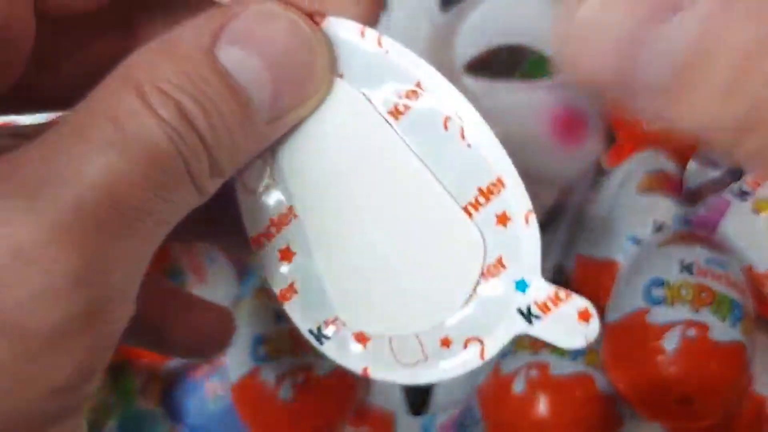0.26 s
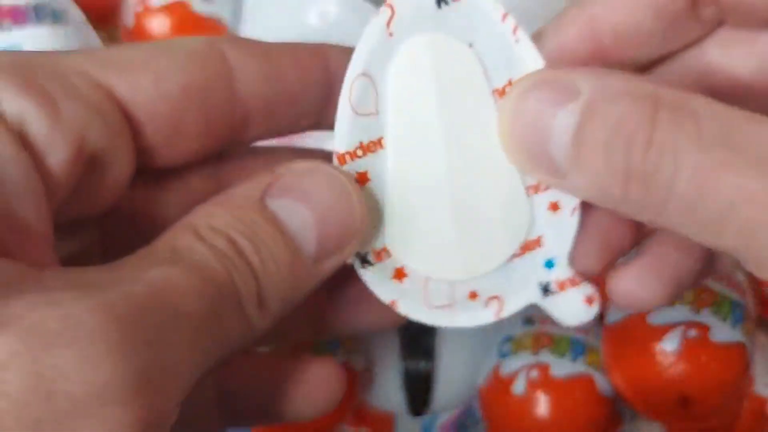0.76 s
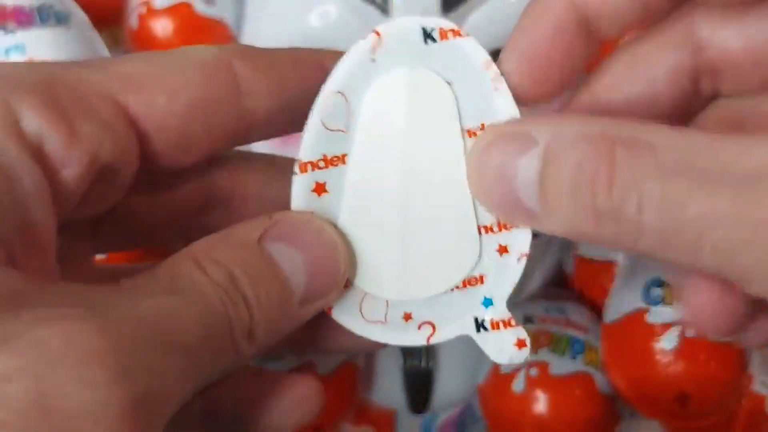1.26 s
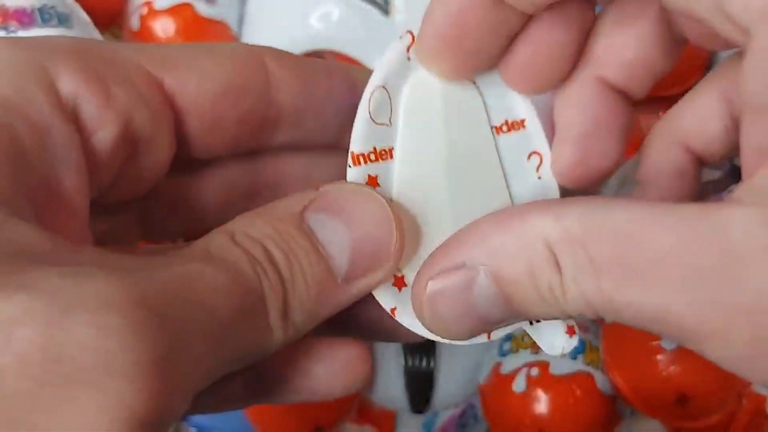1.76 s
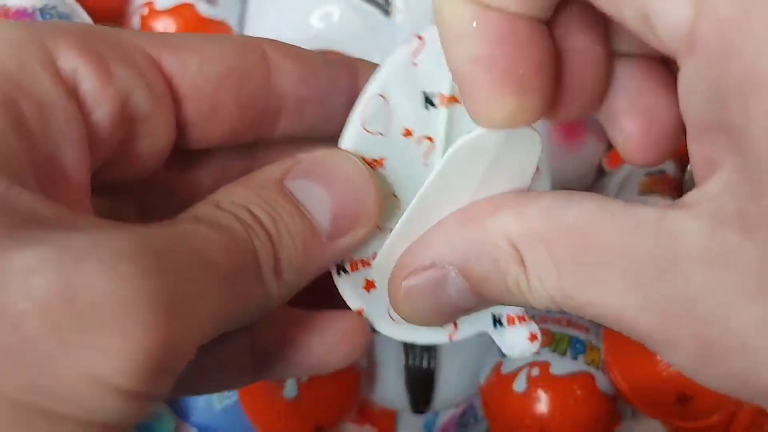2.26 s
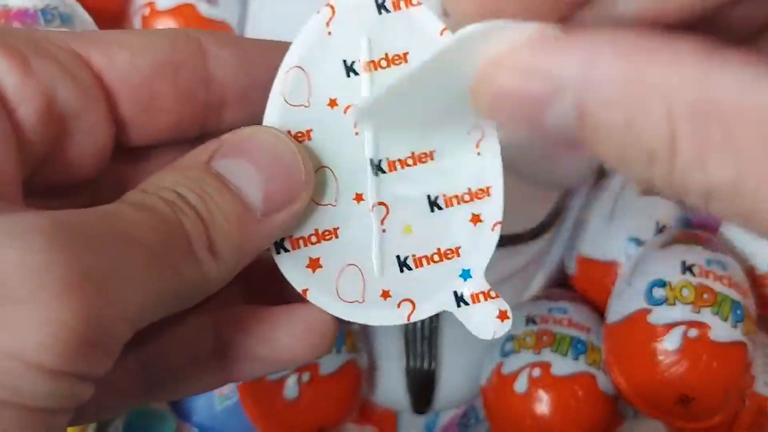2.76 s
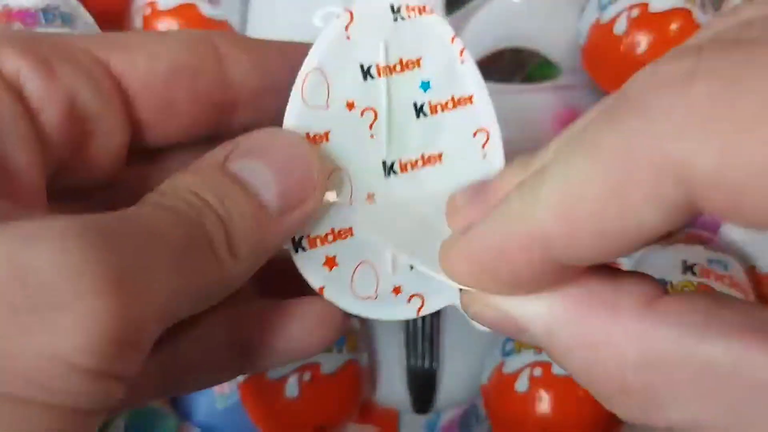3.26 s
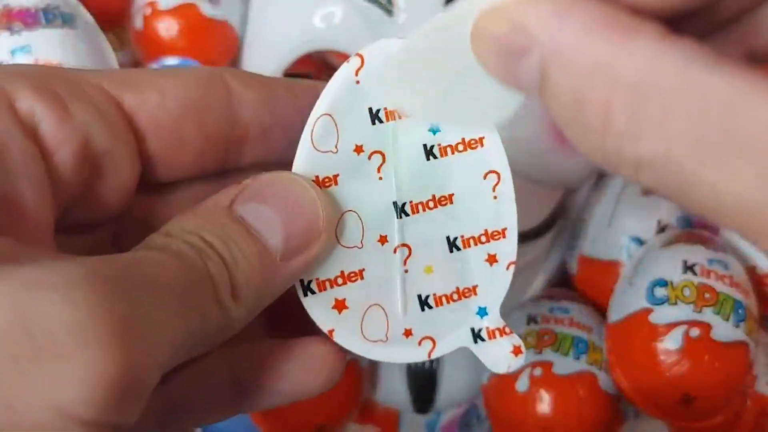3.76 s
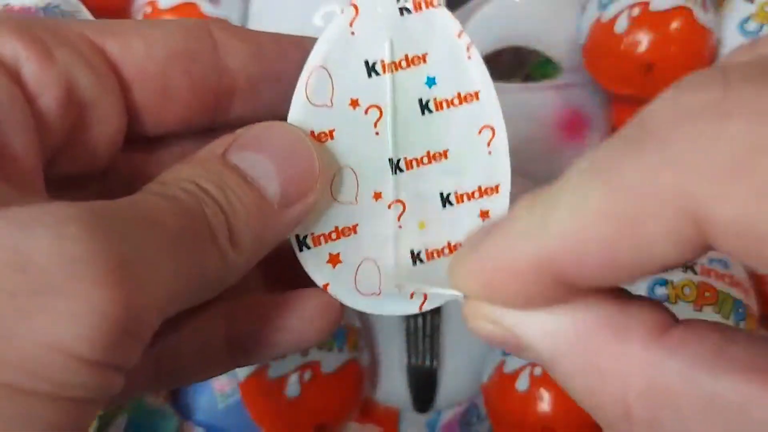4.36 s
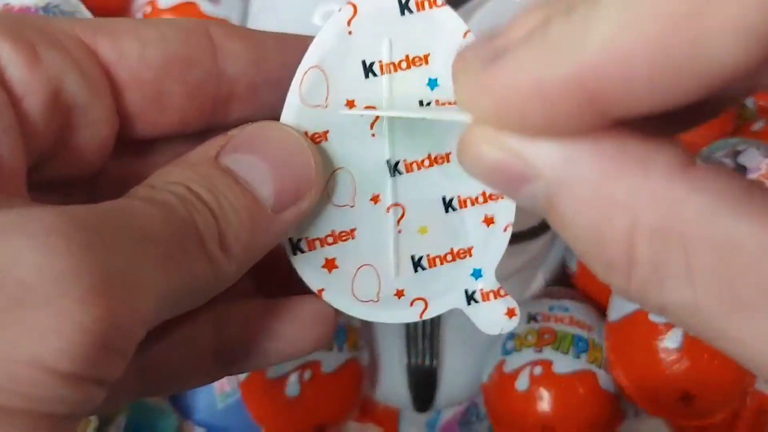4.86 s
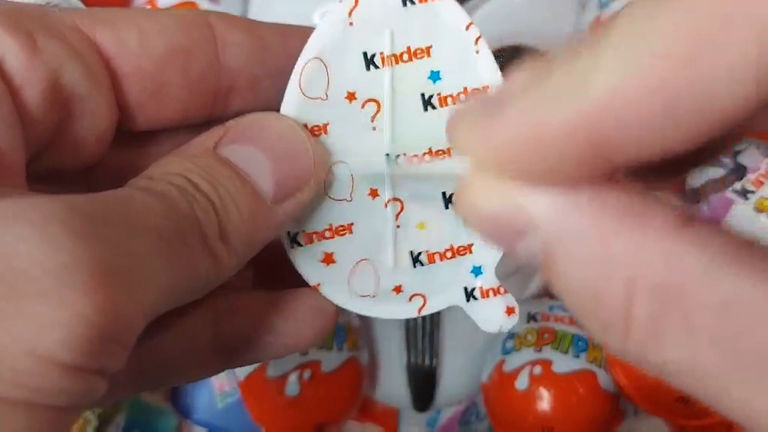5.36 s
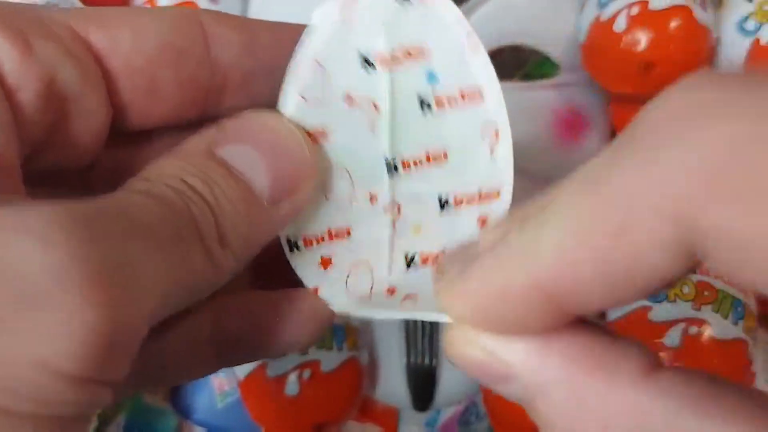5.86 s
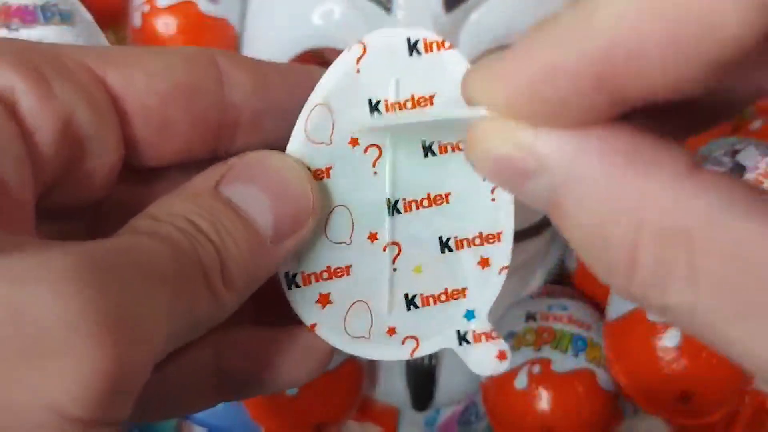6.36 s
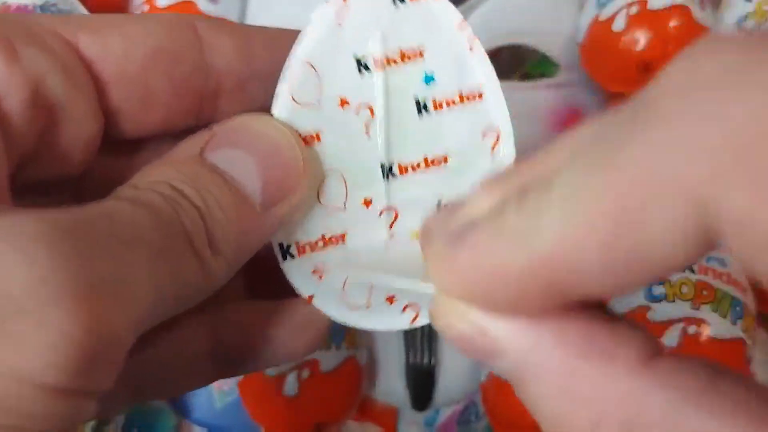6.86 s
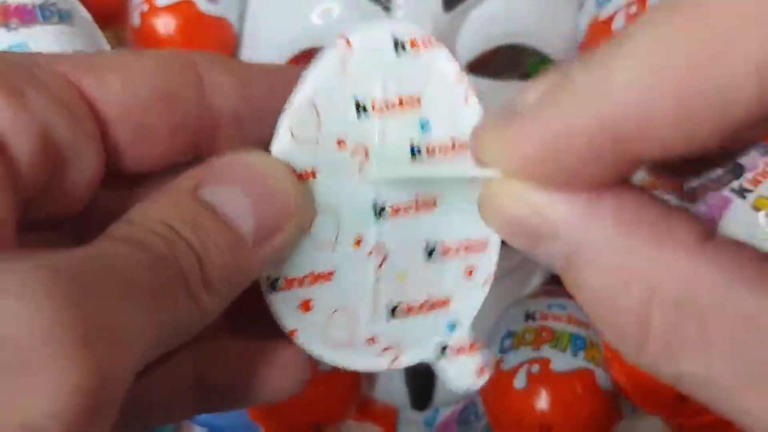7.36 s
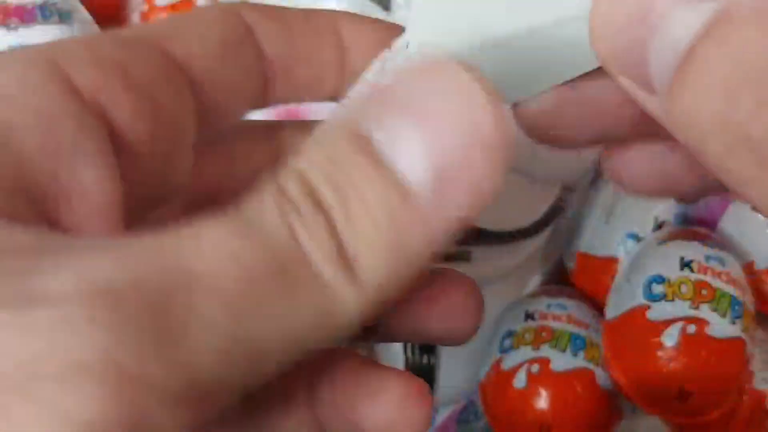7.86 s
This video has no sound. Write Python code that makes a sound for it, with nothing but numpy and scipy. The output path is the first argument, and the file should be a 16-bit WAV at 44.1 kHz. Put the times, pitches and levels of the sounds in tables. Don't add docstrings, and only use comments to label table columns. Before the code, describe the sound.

Close, crisp foil ticks, a loud ripping crackle as glue lets go, slow crinkly scraping, then quick repeated scratchy flicks on a hollow plastic shell.

```python
import sys
import numpy as np
from scipy import signal
from scipy.fft import rfft, irfft, next_fast_len
from scipy.io import wavfile
from scipy.ndimage import uniform_filter1d

SR = 44100
rng = np.random.default_rng(int(sys.argv[2]) if len(sys.argv) > 2 else 0)


def pcm_store(signal):
    levels = np.round(np.clip(np.atleast_2d(signal), -1, 1) * 32767)
    wavfile.write(sys.argv[1], SR, levels.astype(np.int16).T)


def decibels_to_gain(level_db):
    exponent = np.asarray(level_db, float) / 20
    return 10 ** exponent


N = 358091

# freq_hz, level_db (per Hz)
FOIL_COLOUR = [(900, -19), (1500, -2), (2160, -4), (2630, -1.5), (3800, -2), (4300, -1.5), (5100, -4.5),
               (6300, -3.5), (7100, -6), (7600, -21.5), (8000, -22), (8400, -53)]
# freq_hz, level_db (per Hz)
SHELL_COLOUR = [(35, -72.5), (60, -16), (294, -2), (1060, 0), (1270, 2), (1740, -8), (2150, -11),
                (2400, -12), (3120, -51.5), (5280, -120)]


def evened(x):
    return x / np.sqrt(np.mean(x ** 2) + 1e-20)


def read(points, hz):
    freq_hz, value = np.transpose(points)
    return np.interp(np.log(hz + 1), np.log(freq_hz + 1), value)


def add(mix, start_s, sound):
    part = mix[round(start_s * SR):][:len(sound)]
    part += sound[:len(part)]


def causal(*spectra):
    hz = abs(np.fft.fftfreq(4096, 1 / SR))
    level_db = np.maximum(sum(read(s, hz) for s in spectra), -90)
    log_gain = np.log(decibels_to_gain(level_db))
    taps = np.fft.ifft(np.exp(np.conj(signal.hilbert(log_gain)))).real[:1024]
    return taps / np.linalg.norm(taps)


def ring(x, hz, width_hz):
    r = np.exp(-np.pi * width_hz / SR)
    poles = [1, -2 * r * np.cos(2 * np.pi * hz / SR), r * r]
    once = signal.lfilter([1, -1], poles, x)
    return signal.lfilter([1], poles, once)


def patchy(x, depth_db):
    z = signal.stft(x, nperseg=256)[2]
    patches = uniform_filter1d(rng.standard_normal(z.shape), 5, 0)
    patches = uniform_filter1d(patches, 9, 1)
    return signal.istft(z * decibels_to_gain(depth_db * evened(patches)), nperseg=256)[1][:N]


def gritty(grain_db, slips_per_s, wander_db):
    size = decibels_to_gain(grain_db * np.minimum(rng.exponential(1, N), 3))
    happens = rng.random(N) < slips_per_s / SR
    slips = size * happens * rng.standard_normal(N)
    clumps = evened(uniform_filter1d(rng.standard_normal(N), 180))
    hiss = evened(slips) + 0.86 * rng.standard_normal(N)
    return patchy(evened(hiss * decibels_to_gain(grain_db * clumps)), wander_db)


def slide(bright, hollow, grain_db, wander_db, *colour):
    hiss = gritty(grain_db, 2800, wander_db) * bright
    rumble = gritty(grain_db, 1800, wander_db) * hollow
    hiss = signal.oaconvolve(hiss, causal(*colour))[:N]
    return hiss + signal.oaconvolve(rumble, causal(SHELL_COLOUR))[:N]


def air():
    # freq_hz, level_db
    tone_colour = [(35, -24.5), (60, -9), (140, -5), (450, -27.5), (710, -16.5), (1300, -22), (2300, -28.5),
                   (6500, -31.5), (8000, -56)]
    # freq_hz, rms_db
    hum_lines = [(60, -92.5)]
    tone_rms_db = -76.5
    t = np.arange(N) / SR
    gain = decibels_to_gain(read(tone_colour, np.fft.rfftfreq(N, 1 / SR)))
    tone = irfft(rfft(rng.standard_normal(N)) * gain, N)
    waver = 1 + 0.3 * evened(uniform_filter1d(rng.standard_normal(N), 2500))
    hum = sum(decibels_to_gain(db) * np.sqrt(2) * np.sin(2 * np.pi * hz * t) for hz, db in hum_lines)
    return decibels_to_gain(tone_rms_db) * evened(tone) + waver * hum


def rub():
    # start_s, rise_s, hold_s, hiss_db, rumble_db (hollow, relative)
    grips = [(0.059, 0.07, 0.054, -72, -5), (0.41, 0.002, 0.014, -53, -1),
             (0.561, 0.17, 0.22, -54.5, -10.5), (0.813, 0.044, 0.011, -49.5, -4),
             (0.948, 0.07, 0.026, -68.5, -6), (1.021, 0.081, 0.032, -62, -10.5),
             (1.1, 0.038, 0.041, -55.5, -23), (1.201, 0.0064, 0.0096, -53.5, -4.5),
             (1.254, 0.069, 0.015, -55, -32), (1.3, 0.0047, 0.038, -56, -13),
             (1.344, 0.044, 0.0037, -52.5, -3), (1.592, 0.0035, 0.0049, -49.5, -2.5),
             (1.659, 0.0098, 0.0051, -65.5, -9), (1.779, 0.025, 0.006, -57.5, 1.5),
             (1.511, 0.0053, 0.032, -50, -4.5), (1.733, 0.24, 0.02, -51, -1.5),
             (1.974, 0.038, 0.14, -67.5, 1.5), (2.694, 0.013, 0.0085, -66, -6.5),
             (2.866, 0.031, 0.0058, -63, 3), (7.594, 0.0069, 0.033, -48, -0.5),
             (7.706, 0.01, 0.0036, -49, 9), (7.773, 0.0056, 0.08, -53, -4), (7.958, 0.099, 0.076, -46, -6),
             (8.112, 0.063, .02, -52, -20)]
    # start_s, rise_s, hold_s, hiss_db, rumble_db
    drags = [(2.15, 0.018, 0.13, -58, -5), (2.268, 0.072, 0.005, -30.5, 1.5),
             (2.319, 0.025, 0.13, -49.5, -3), (2.502, 0.1, 0.12, -48.5, -5),
             (2.948, 0.0052, 0.0091, -48.5, 5), (3.079, 0.098, 0.35, -46.5, -7),
             (3.305, 0.038, 0.06, -48, -8), (3.474, 0.2, 0.023, -62.5, -15),
             (3.589, 0.025, 0.071, -58, -1.5), (3.694, 0.12, 0.22, -46.5, -10.5),
             (3.933, 0.042, 0.056, -44.5, -1.5), (4.074, 0.024, 0.054, -55.5, 5.5),
             (4.141, 0.036, 0.015, -36.5, -3.5), (4.21, 0.023, 0.14, -51.5, -22.5),
             (4.366, 0.28, 0.092, -48, -6.5), (3.146, 0.018, 0.0049, -43.5, 1), (3.71, .008, .008, -48, 0),
             (3.81, 0.0054, 0.0027, -50, -4), (4.483, 0.011, 0.002, -38.5, -3),
             (4.526, 0.0094, .003, -49.5, -21), (7.455, 0.015, 0.0043, -39.5, 3)]
    # freq_hz, level_db
    skin_colour = [(1400, -7), (2300, -17), (3150, -16), (3500, -6.5), (4500, -6.5), (7000, -8.5)]
    # freq_hz, level_db
    drag_colour = [(1500, -1.5), (3000, -1), (5000, 0), (6500, 2), (7200, -2)]
    rise_db, sag_db_per_s, lift_db_per_s = 36.5, 26, 603.5
    skin_until_s = 1.29

    t = np.arange(0, N, 64) / SR
    start_s, rise_s, hold_s, hiss_db, rumble_db = np.transpose(grips + drags)[:, :, None]
    since = t - start_s
    eased_db = sag_db_per_s * since + lift_db_per_s * np.maximum(since - hold_s, 0)
    lost_db = np.where(since < 0, -rise_db * since / rise_s, eased_db)
    press = decibels_to_gain(hiss_db - lost_db)
    now = np.arange(N) / SR
    bright = np.interp(now, t, press.sum(0))
    hollow = np.interp(now, t, (press * decibels_to_gain(rumble_db)).sum(0))
    skin = now < skin_until_s
    fingers = slide(bright * skin, hollow * skin, 0.16, 3.6, FOIL_COLOUR, skin_colour)
    spoon = slide(bright * ~skin, hollow * ~skin, 2.3, 2.2, FOIL_COLOUR, drag_colour)
    return fingers + spoon


def flicks():
    # start_s, landing_db, scrape_db, scrape_s
    quick_flicks = [(4.7425, -25.5, -37.5, 0.094), (4.924, -31, -40.5, 0.065), (5.093, -44, -37.5, 0.047),
                    (5.255, -30.5, -31.5, 0.07), (5.4305, -24, -34, 0.08), (5.582, -21, -32.5, 0.11),
                    (5.75, -37, -29.5, 0.098), (5.914, -36.5, -33, 0.079), (6.069, -27.5, -31, 0.069),
                    (6.2352, -29, -30.5, 0.083), (6.376, -30.5, -37, 0.069), (6.516, -36.5, -46.5, 0.083),
                    (6.6367, -49, -37.5, 0.075), (6.789, -44, -30, 0.047), (6.911, -42, -30.5, 0.091),
                    (7.2246, -27, -28, 0.094), (7.396, -30.5, -29, 0.044)]
    # start_s, landing_db, scrape_db, scrape_s
    grazes = [
        (0.488, -56, -45.5, 0.054),
        (7.128, -75.5, -62, 0.024),
    ]
    # freq_hz, level_db
    edge_colour = [(2200, -0.5), (6800, -2.5)]
    pressure, t = np.zeros(N), np.arange(8000) / SR
    for start_s, land_db, scrape_db, scrape_s in quick_flicks + grazes:
        crunch = decibels_to_gain(land_db - 7.0) * (0.04 + t / 0.0038) * np.exp(1 - t / 0.0048)
        lift = 1 / (1 + np.exp((t - scrape_s) / 0.0059))
        scrape = decibels_to_gain(scrape_db - 8.5 - 102 * t) * np.tanh(t / 0.0013) * lift
        add(pressure, start_s, crunch + scrape)
    return slide(pressure, decibels_to_gain(-1.5) * pressure, 2.6, 3.0, FOIL_COLOUR, edge_colour)


def snaps():
    # start_s, crack_peak_db, ring_peak_db, ring_hz (hollow ring of the shell)
    ticks = [(0.518, -10, -29, 2030), (0.8147, -27.5, -36, 1380), (0.8185, -32.5, -59, 1700),
             (1.2, -51, -48.5, 380), (1.305, -36, -54.5, 1380), (1.366, -30, -54, 1970),
             (1.5102, -37, -42, 1130), (1.555, -14.5, -37, 1400), (1.597, -29, -58, 616),
             (1.7066, -34, -37, 1210), (1.73, -38, -42, 1350), (1.7375, -35, -24, 1133),
             (1.7416, -46, -37, 1244), (1.7553, -36.5, -34, 968), (1.9059, -18.5, -34, 1950),
             (1.982, -57.5, -48.5, 740), (2.0235, -26, -26, 2040), (2.041, -27, -47, 2080),
             (2.047, -44, -38, 950), (2.795, -50, -61, 1704), (2.876, -40.5, -51, 1213),
             (7.63, -25.5, -43, 1400), (7.7027, -50, -32, 1180), (7.7333, -29.5, -51, 1370),
             (7.984, -27, -62, 1360), (8.0032, -21, -50, 1330), (8.0403, -28, -68, 1400)]
    tear = [(2.1257, -5, -45, 1660), (2.1309, -14, -24.5, 1840), (2.142, -6.5, -29, 2270),
            (2.148, -4.5, -17.5, 1654), (2.17, -16.5, -22.5, 1943), (2.1923, -5.5, -13, 1184),
            (2.198, -12, -8.5, 1945), (2.2177, -18.5, -26.5, 1932), (2.221, -13.5, -28, 1672),
            (2.226, -15.5, -30.5, 1745), (2.2345, -8, -14, 1827), (2.238, -18.5, -20.5, 1070),
            (2.2427, -12.5, -20, 1792), (2.2478, -8.5, -23.5, 919), (2.2526, -13, -16, 990),
            (2.2643, -11, -15.5, 920), (2.2744, -11.5, -19.5, 968), (2.2812, -13.5, -23, 1170),
            (2.286, -12, -18.5, 1223), (2.2937, 1.5, -13.5, 998), (2.4578, -46, -30.5, 774),
            (2.505, -26, -23.5, 2000), (2.5116, -18, -28, 950), (2.532, -24.5, -25, 972),
            (2.5413, -45.5, -27, 1190), (2.5793, -49, -35.5, 1200), (2.608, -18.5, -23, 1324)]
    threads = [(2.0597, -37, -52, 1490), (2.153, -27, -39, 1700), (2.16, -26, -36, 1690),
               (2.1817, -45, -45, 1620), (2.201, -6, -25, 1700), (2.27, -20, -31.5, 1098),
               (2.2908, -10.5, -23.5, 988), (2.708, -42, -66.5, 1500), (1.38, -65, -49, 700),
               (1.711, -50, -40.5, 1520), (1.72, -49, -40, 1090), (1.763, -51, -43, 1300),
               (1.7445, -34, -30.5, 1900)]
    trips = [(2.9491, -34, -22.5, 640), (3.076, -58, -34.5, 565), (3.124, -12.5, -25, 715),
             (3.167, -14.5, -26.5, 760), (3.257, -21.5, -39, 1065), (3.285, -27.5, -42, 1120),
             (3.3492, -18, -30, 950), (3.365, -23.5, -29.5, 1300), (3.4303, -29, -25.5, 671),
             (3.5199, -65, -38.5, 653), (3.5922, -47, -35, 693), (3.69, -47.5, -39, 1480),
             (3.7579, -14.5, -23, 1030), (3.8508, -26.5, -26, 920), (3.8561, -47, -26.5, 1340),
             (3.8794, -37, -26.5, 426), (3.8988, -39, -33.5, 1200), (3.94, -20, -31, 1270),
             (3.946, -12, -14, 1370), (4.0479, -18.5, -30.5, 780), (4.145, -13.5, -34, 1410),
             (4.1976, -34, -27.5, 626), (4.2286, -7.5, -23.5, 1350), (4.2624, -21, -25.5, 990),
             (4.2776, -44, -31, 400), (4.381, -22, -55, 1480), (4.4269, -27.5, -26.5, 1260),
             (4.4654, -35, -71, 1287), (4.493, -30.5, -48, 1250), (4.5362, -23, -41, 694)]
    bites = [(4.7501, -13.5, -15.5, 1600), (4.7604, -19.5, -23.5, 568), (4.9257, -25, -33, 810),
             (5.0941, -49, -29, 676), (5.0879, -41, -35.5, 598), (5.2604, -6.5, -18, 590),
             (5.4378, -2, -20.5, 1070), (5.5876, -7.5, -18, 1190), (5.5956, -16, -30.5, 1330),
             (5.751, -27, -22.5, 1170), (5.7576, -10, -15, 860), (5.915, -32, -24.5, 1270),
             (5.9239, -28, -26, 990), (5.9485, -18.5, -43, 1300), (6.0724, -16.5, -20, 1270),
             (6.0903, -21, -18, 784), (6.2389, -6, -12.5, 1160), (6.2616, -17, -47, 1210),
             (6.38, -21, -19, 613), (6.3924, -12.5, -19, 764), (6.5051, -29.5, -32, 597),
             (6.5212, -39, -19, 750), (6.641, -41, -22.5, 606), (6.7977, -22.5, -25.5, 1203),
             (6.8167, -26, -31, 1354), (6.9188, -7.5, -16.5, 1570), (7.232, -4.5, -14.5, 807),
             (7.2388, -9, -23.5, 1260), (7.2535, -18, -40, 1180), (7.4096, -18, -19.5, 483)]
    skips = [(4.789, -34, -24.5, 1185), (4.7938, -16.5, -21.5, 1380), (4.96, -31.5, -30, 1430),
             (4.9752, -26.5, -31, 1200), (4.991, -30.5, -42, 1130), (5.139, -31.5, -33.5, 1176),
             (5.1598, -35, -57, 1250), (5.3122, -14, -21, 770), (5.4684, -18.5, -26.5, 1250),
             (5.4872, -19.5, -15.5, 1220), (5.5008, -42, -21.5, 1290), (5.653, -16, -21, 880),
             (5.6637, -30, -21.5, 1240), (5.799, -19, -16.5, 1080), (5.8192, -13, -21.5, 1040),
             (6.0006, -31, -31.5, 1330), (6.1481, -16.5, -17, 1280), (6.291, -10.5, -20, 1150),
             (6.4266, -19.5, -27, 1410), (6.4355, -15.5, -21, 1310), (6.553, -45, -28.5, 890),
             (6.674, -22.5, -33.5, 1260), (6.6832, -28, -29.5, 568), (6.8308, -23, -20, 1180),
             (6.9667, -18, -22, 1240), (6.9776, -17.5, -25.5, 1300), (7.2823, -19, -19.5, 1300),
             (7.2985, -22, -25, 1200), (7.4596, -19, -34.5, 1270), (7.4853, -9, -14, 1385)]
    creaks = [
        (1.8397, -52, -60.5, 743),
        (1.8546, -58, -69, 660),
        (3.4185, -27.5, -33.5, 900),
        (3.6184, -37, -38.5, 613),
        (4.4352, -43, -29.5, 583),
        (6.1235, -24, -35, 1303),
        (6.576, -31.5, -43, 1240),
        (6.878, -39.5, -43, 826),
        (7.056, -48.5, -49, 1320),
    ]
    glue_modes = [4345, 5820, 4250]
    crease_modes = [2530, 3430, 2400]
    # rise_s, t60_s, mode_share, mode_width_hz, spike (the break against the rattle)
    glue = (.0004, 0.012, .3, 1300, 8)
    # rise_s, t60_s, mode_share, mode_width_hz, spike
    crease = (.0009, .021, 0.17, 1400, 5.66)

    rows = [(row, glue_modes, glue) for row in tear + ticks]
    rows += [(row, crease_modes, crease) for row in trips + bites + skips + creaks]
    rows += [(row, glue_modes, glue) for row in threads]
    out, t = np.zeros(N), np.arange(900) / SR
    foil, shell = causal(FOIL_COLOUR), causal(SHELL_COLOUR)
    burst = 1 + 0.65 * np.exp(-((t - 0.0009) / 0.00013) ** 2)
    for k, (row, modes, material) in enumerate(rows):
        start_s, crack_db, ring_db, ring_hz = row
        rise_s, t60_s, share, width_hz, spike = material
        swell = 1 - np.exp(-(t / rise_s) ** 2)
        rattle = rng.standard_normal(len(t)) * decibels_to_gain(-60 * t / t60_s) * swell * burst
        snap = rattle - spike * (np.arange(len(t)) == round(rise_s * SR))
        mode = evened(ring(rattle, modes[k % len(modes)], width_hz))
        crack = np.convolve(evened(snap) + share * mode, foil)[:len(t)]
        knock = np.gradient(rattle * decibels_to_gain(-60 * t / 0.037))
        hollow = evened(ring(knock, ring_hz, 720))
        hollow = hollow + 0.83 * evened(np.convolve(knock, shell)[:len(t)])
        crack = decibels_to_gain(crack_db - 1.0) * crack / abs(crack).max()
        hollow = decibels_to_gain(ring_db + 4.5) * hollow / abs(hollow).max()
        add(out, start_s - 0.0004, crack + hollow)
    return signal.lfilter(*signal.butter(2, 100, "high", fs=SR), out)


def squeaks():
    # top_s, length_s,
    # rms_db, pitch_hz
    narrow_bursts = [(1.362, 0.023, -39, 2430), (1.363, 0.017, -40, 1500), (1.364, 0.027, -47, 4970),
                     (2.971, 0.0058, -44, 4140), (2.2228, 0.0059, -20, 6250), (2.24, 0.0034, -24.5, 6340),
                     (2.25, 0.018, -25.5, 4250), (2.254, 0.0055, -16.5, 6200), (2.2695, 0.005, -21, 6340),
                     (4.807, 0.011, -48, 6750), (4.947, 0.0091, -37, 6850), (5.119, 0.013, -33.5, 6850),
                     (5.272, 0.023, -36, 6760), (5.3, 0.0055, -35, 3600), (5.437, 0.011, -20.5, 3410),
                     (5.593, 0.0089, -27, 4200), (6.073, 0.0075, -34, 6600), (6.081, 0.0087, -28.5, 6670),
                     (6.105, 0.013, -39.5, 6390), (6.121, .014, -42.5, 6840), (6.245, 0.0078, -25, 6650),
                     (6.25, 0.012, -28, 3400), (6.265, 0.014, -29, 6850), (6.266, 0.018, -30.5, 2720),
                     (6.293, 0.004, -22.5, 6205), (6.396, 0.009, -31, 6800), (6.536, 0.013, -38, 2890),
                     (6.536, 0.015, -48, 6860), (6.669, 0.009, -35, 6770), (6.796, 0.0099, -42, 6200),
                     (6.801, 0.0093, -27, 3430), (7.234, 0.007, -16.5, 5700), (7.249, 0.013, -31.5, 6490),
                     (7.419, .026, -30.5, 6860), (7.42, 0.0095, -30.5, 3260), (7.463, .012, -37, 3770),
                     (2.513, .005, -22.5, 3100), (2.532, .006, -34, 3000), (2.798, .005, -53, 3200),
              (2.708, .008, -62, 2600), (3.076, .03, -49.5, 5600), (3.118, .008, -36.5, 1110),
              (3.26, .008, -40.5, 6820), (3.289, .005, -37.5, 6560), (3.318, .012, -42, 6650),
              (3.47, .007, -63, 4170), (3.724, .005, -38.5, 790), (3.812, .006, -48, 900),
              (3.868, .006, -32, 900), (3.965, .006, -40, 3670), (3.963, .006, -48, 7000),
              (3.995, .01, -43.5, 7100), (4.15, .007, -26, 5410), (4.165, .014, -37, 6920),
              (4.166, .014, -37, 3300), (4.255, .006, -33.5, 4330), (4.307, .007, -44, 6160),
              (0.822, .016, -40, 3200), (0.824, 0.0094, -51, 6400), (0.822, 0.012, -44, 1590),
              (1.585, .006, -48, 390), (4.42, 0.00506, -41, 745), (4.467, 0.008, -37, 6440),
              (4.39, 0.0063, -39.5, 4250), (5.848, 0.0052, -46.5, 3850), (4.486, 0.008, -43.5, 596),
              (3.0, .005, -60, 3200), (5.452, 0.0086, -29.5, 3300), (5.596, .006, -25, 3000),
              (5.434, 0.0044, -25, 5800), (5.756, .01, -33, 2600), (0.539, .01, -48, 250),
              (1.202, .012, -46.5, 252), (1.553, .02, -54, 200), (2.954, .012, -39, 250),
              (3.317, .015, -43.5, 450), (4.933, .015, -41, 302), (5.094, .015, -34.5, 304),
              (5.143, .012, -38.5, 597), (6.557, .01, -38, 297), (6.69, .012, -39, 250),
              (2.322, .024, -37.5, 1050), (2.361, 0.027, -44, 1100)]
    out = np.zeros(N)
    for top_s, length_s, db, hz in narrow_bursts:
        t = np.arange(-length_s, min(length_s, 0.02), 1 / SR)[:2000]
        swell = np.exp(-(2.7 * t / length_s) ** 2)
        tone = evened(ring(rng.standard_normal(2000), hz, 570))[:len(t)]
        add(out, top_s - length_s, decibels_to_gain(db) * swell * tone)
    return out


def room(x):
    # freq_hz, t60_s
    decay = [(200, 0.89), (700, 0.38), (1300, 0.36), (3000, 0.27), (9000, 0.2)]
    # freq_hz, level_db
    walls = [(700, -2), (1100, -0.5), (1550, 3), (1900, -0.5), (4000, 0), (7000, 0)]
    x = signal.oaconvolve(x, causal(walls))[:N]
    out, size = 0, next_fast_len(N + SR)
    turn = 2 * np.pi * 2.3 * np.arange(N) / SR
    at = np.arange(200, SR // 2 - 20, 20)
    for k in range(3):
        taps = np.zeros(SR // 2)
        taps[at + rng.integers(0, 20, len(at))] = rng.choice([-1., 1.], len(at))
        hz, t, z = signal.stft(taps, SR, nperseg=256)
        fade = decibels_to_gain(-60 * t / read(decay, hz)[:, None])
        tail = signal.istft(z * fade, SR, nperseg=256)[1]
        sent = x * np.cos(turn + k * np.pi / 3)
        out = out + rfft(sent, size) * rfft(tail / np.linalg.norm(tail), size)
    return irfft(out, size)[:N] * np.sqrt(2 / 3)


def scene():
    # freq_hz, level_db
    table_dip = [(1750, 0), (2080, -2), (2400, 0)]
    hands = snaps() + rub() + flicks() + squeaks()
    hands = signal.lfilter(*signal.butter(2, 70, "high", fs=SR), hands)
    hands = signal.oaconvolve(hands, causal(table_dip))[:N]
    return (hands + decibels_to_gain(-21.5) * room(hands) + air())[None]


def mirrored(x):
    # freq_hz, level_db
    leak = [(8000, 0), (8500, -5), (9300, -13.5), (10000, -23.5), (10500, -32), (11500, -47.5)]
    mirror_hz, notch_hz = 8000, 201.5
    z, hz = rfft(x), np.fft.rfftfreq(N, 1 / SR)
    edge = round(mirror_hz * N / SR)
    image = np.conj(z[:, edge::-1]) * decibels_to_gain(read(leak, hz[edge:2 * edge + 1]))
    both = np.concatenate([z[:, :edge], image], axis=1)
    gap = np.tanh(abs(hz[:2 * edge + 1] - hz[edge]) / notch_hz)
    return irfft(both * gap, N)


def band_limit(x):
    return signal.sosfilt(signal.butter(12, 11330, fs=SR, output="sos"), x)


def record(dry):
    rounded = np.tanh(dry * 1.072) / 1.136
    band = signal.firwin(201, 11150, window=("kaiser", 9), fs=SR)
    limited = signal.oaconvolve(mirrored(rounded), band[None], "same")
    return band_limit(limited)


dry = scene()
out = record(dry)
pcm_store(out)
```